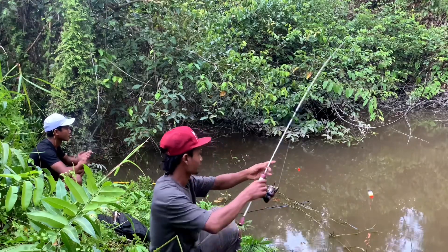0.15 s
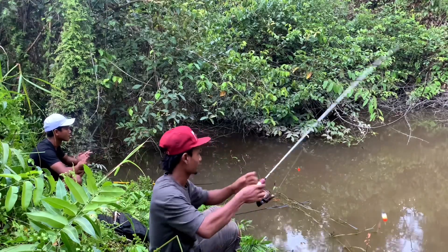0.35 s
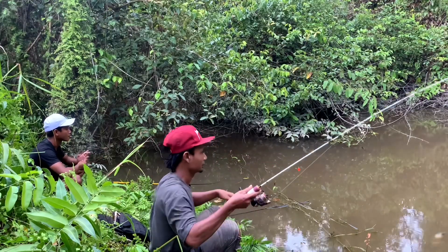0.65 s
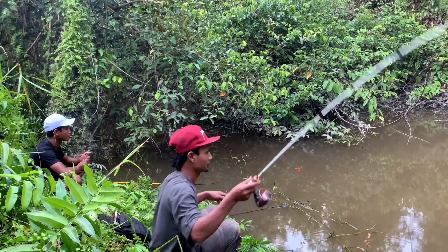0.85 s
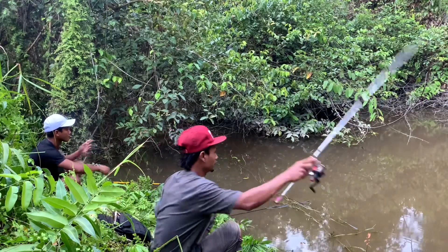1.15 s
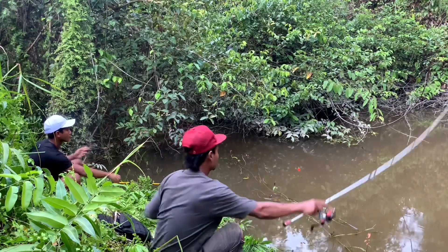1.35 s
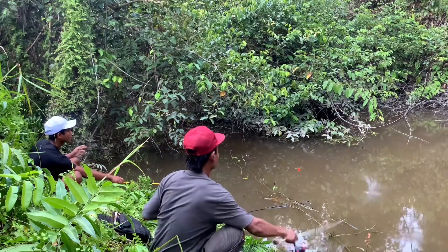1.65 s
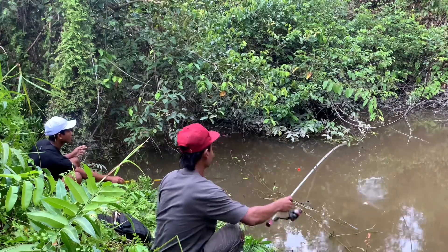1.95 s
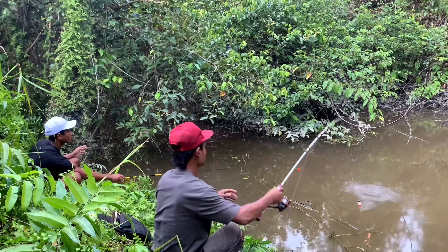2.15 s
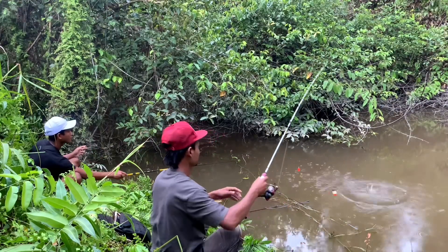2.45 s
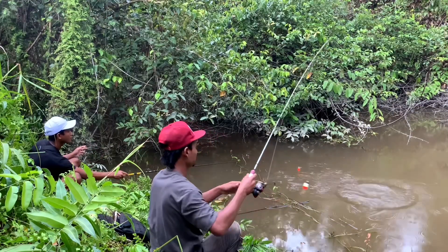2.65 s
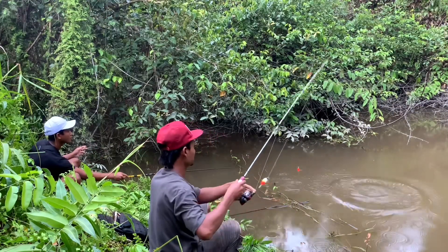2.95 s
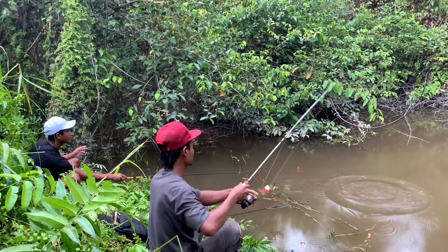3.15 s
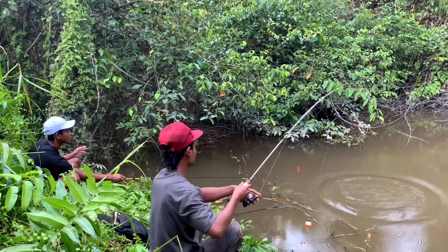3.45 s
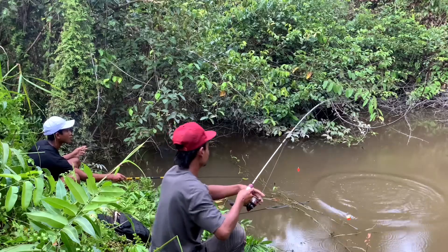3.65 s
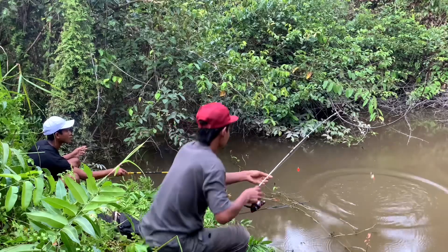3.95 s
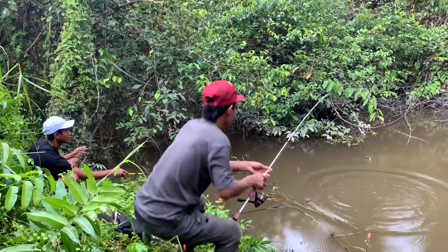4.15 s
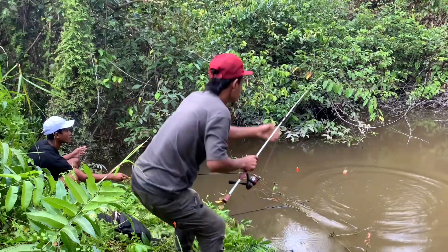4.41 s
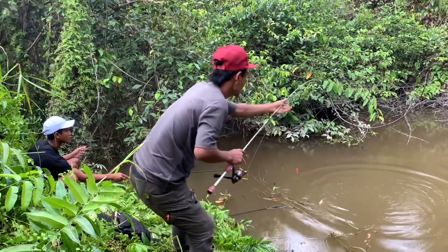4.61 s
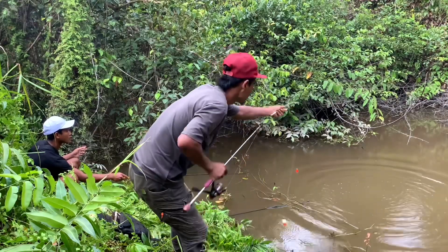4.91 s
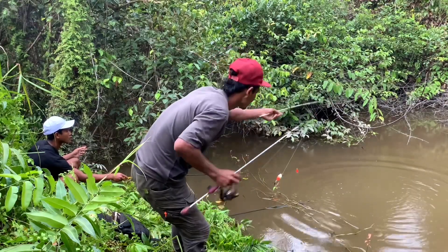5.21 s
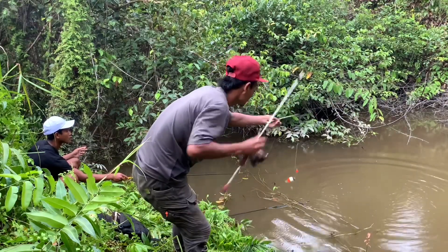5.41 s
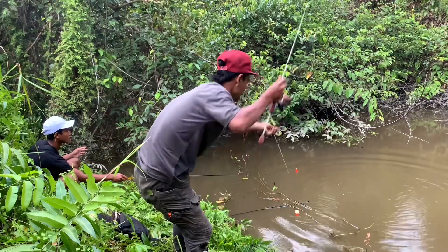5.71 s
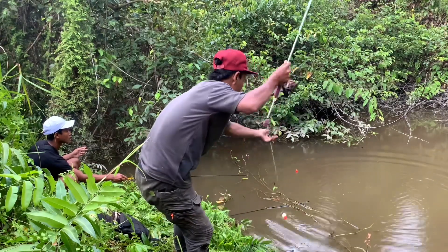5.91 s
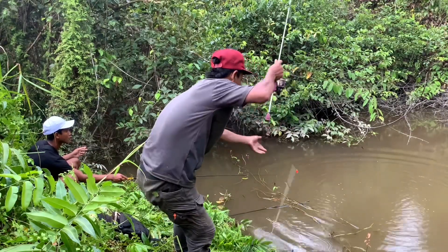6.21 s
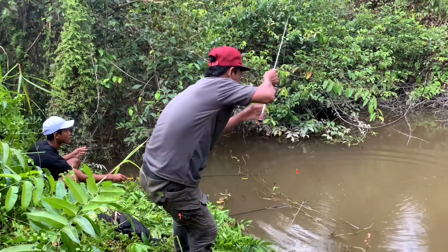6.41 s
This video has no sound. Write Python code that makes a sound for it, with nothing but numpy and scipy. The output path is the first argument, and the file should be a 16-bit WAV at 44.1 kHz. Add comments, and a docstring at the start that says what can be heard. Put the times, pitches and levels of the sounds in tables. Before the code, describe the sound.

High crickets trill in repeated bursts over a steady insect hiss, while frogs pip at several pitches along a forest river. Nearby, a fishing reel clicks and a cast hits the water with a sharp slap, followed by falling drops and bubbles. Plants rustle briefly, then line and cloth slide softly and the reel clicks again. The frogs grow gradually louder, echoing lightly off the trees.

```python
"""Crickets trill over a steady insect hiss while low and high frogs pip along a forest river bank.
Each stroke of a cricket's wings makes one tiny note; each frog call is a rising note that echoes off
the trees. Faint whistles drift in. An angler's reel clicks, plants rustle and the swung rod hums.
The cast slaps the water, drops fall back and bubbles of trapped air ring.
Later, line and sleeve slide over the rod and cloth brushes softly."""
import sys
import numpy as np
from scipy import signal
from scipy.fft import rfft, irfft, next_fast_len
from scipy.io import wavfile
from scipy.ndimage import uniform_filter1d

SR = 44100
rng = np.random.default_rng(int(sys.argv[2]) if len(sys.argv) > 2 else 0)


def wrap_up_sound(samples):
    """Save the sound to the file named by the first command line argument, as 16-bit audio."""
    columns = np.atleast_2d(samples).T
    # keep every value between -1 and 1, then stretch to whole-number steps
    tamed = np.clip(columns, -1, 1)
    steps = np.round(tamed * 32767).astype(np.int16)
    wavfile.write(sys.argv[1], SR, steps)


N = 289737
TIME = np.arange(N) / SR

def undb(db):
    """Turn decibels into a number to multiply a sound by."""
    return 10 ** (np.asarray(db) / 20)

def unit(x):
    """Scale a sound to an average strength (rms) of 1."""
    return x / np.sqrt(np.mean(x ** 2))

def colour(x, points):
    """Shape the lows and highs by (frequency [Hz], level [dB]) points; the result has strength 1."""
    hz, db = np.transpose(points)
    size = next_fast_len(N)
    freqs = np.maximum(np.fft.rfftfreq(size, 1 / SR), 1)
    gain = undb(np.interp(np.log(freqs), np.log(hz), db))
    return unit(irfft(rfft(x, size) * gain, size)[..., :N])

def walk(rate):
    """A random wander, mostly between -1 and 1, that turns `rate` times a second."""
    knots = rng.standard_normal(int(N / SR * rate) + 2)
    return np.interp(TIME * rate, np.arange(len(knots)), knots)

def pair(x, width):
    """Mix two unrelated signals into left and right; width 0 makes both ears alike."""
    return x[0] + width * x[1] * np.array([[1], [-1]])

def noise(points, width):
    """Steady stereo noise with the given tone colour."""
    return colour(pair(rng.standard_normal((2, N)), width), points)

def wavering_tone(hz, depth, rate):
    """A pure tone whose pitch wanders at random."""
    return np.sin(2 * np.pi * np.cumsum(hz * (1 + depth * walk(rate))) / SR)

def add(out, s, x):
    """Mix a short sound in at s seconds."""
    i = int(s * SR)
    a, b = max(i, 0), min(i + x.shape[-1], N)
    if b > a:
        out[..., a:b] += x[..., a - i:b - i]

def forest(x, t60, early_db, early_s=0.025):
    """Echoes only: a few from near trunks, and a smooth forest tail that falls 60 dB in t60 seconds."""
    t = np.arange(SR // 2) / SR
    shape = (2, len(t))
    trunks = (rng.random(shape) < 900 / SR) * rng.choice([-1, 1], shape) * np.sqrt(SR / 900)
    tail = rng.standard_normal(shape) * undb(-60 * t / t60)
    echoes = tail + trunks * undb(early_db) * np.exp(-t / early_s)
    echoes *= 1 - np.exp(-(t / 0.0088) ** 2)  # echoes take a moment to arrive
    echoes /= np.sqrt(np.sum(echoes ** 2, axis=1, keepdims=True))
    return signal.fftconvolve(np.atleast_2d(x), echoes, axes=1)[:, :N]

def bounce(x, late_ms, db):
    """Add one near echo, always equally late as the caller sits still; it makes gliding notes pulse."""
    lag = round(late_ms * SR / 1000)
    echo = undb(db) * np.pad(x, ((0, 0), (lag, 0)))[:, :N]
    return (x + echo) / np.sqrt(1 + undb(db) ** 2)

def pip(hz, half_s, sweep, lead_ms=0, sag=0, attack=1, scoop=0):
    """One gliding note that swells as it passes the pitch at which the caller's body rings best."""
    u = np.linspace(-1, 1, 2 * int(half_s * SR))  # -1 at the start, 1 at the end
    # in octaves: sweep tilts the pitch, sag lowers its end, scoop lowers its start
    pitch = hz * 2 ** (sweep * u - sag * np.maximum(u, 0) ** 2 - scoop * np.minimum(u, 0) ** 2)
    left_lead = np.pi * hz * lead_ms / 1000 * np.array([[1], [-1]])
    phase = 2 * np.pi * np.cumsum(pitch) / SR + left_lead
    foot = np.where(u < 0, .2 * min(attack, 1), .2)
    off_peak = np.where(u < 0, u / attack, u) / .36
    swell = np.cos(np.pi * u / 2) * (foot + (1 - foot) / (1 + off_peak ** 6))
    return np.sqrt(2) * swell * np.sin(phase)

# When the nearest cricket starts each trill: (time [s])
TRILL_TIMES = [-.27, .5, 1.26, 2.09, 3.23, 3.99, 4.775, 5.49, 6.235]
def cricket(after_s, length_s, hz, sag, db, echo_db, lead_ms, strokes_per_s=44.5):
    """Each wing stroke makes a note that sags as the wing slows; a trill starts soft and a bit low."""
    out = np.zeros((2, N))
    for start in np.array(TRILL_TIMES) + after_s:
        for s in np.arange(start, start + length_s, 1 / strokes_per_s):
            slack = np.exp(-(s - start) / 0.042)
            size, detune, late = rng.standard_normal(3)
            note = pip(hz * (1 - 0.021 * slack + .002 * detune), 0.0144, -0.018, lead_ms, sag)
            add(out, s - .014 + .0004 * late, undb(db - 4.7 * slack + size) * note)
    return out + undb(echo_db) * forest(out, t60=0.45, early_db=5, early_s=0.014)

# Crickets far away: (pitch [Hz], level [dB])
FAR_CRICKET_TONES = [(7522, -50.5), (7613, -53.5), (8068, -49.5), (8312, -57)]
def far_crickets():
    """Single far crickets stand out of the hiss as thin wavering tones."""
    out = np.zeros((2, N))
    for hz, db in FAR_CRICKET_TONES:
        out += wavering_tone(hz, depth=.006, rate=300) * undb(db + 2 * walk(3.7))
    return forest(out, t60=0.2, early_db=6)

# Tone colour of countless insects: (frequency [Hz], level [dB])
INSECT_COLOUR = [(5900, -29), (6300, -15), (6650, -2), (6950, 6.5), (7250, 2), (7550, 2.5), (7850, 2),
                 (8100, -5.5), (8450, -12.5), (8900, -25), (9400, -105)]
def insect_hiss():
    """Distant insects merge into a shimmering hiss; the highest of them sit to the right."""
    hiss = noise(INSECT_COLOUR, width=1) * undb(-35 + .5 * walk(2.7) + 1.04 * walk(60))
    buzz_colour = [(7500, -55.5), (7850, -13), (8070, 7.5), (8400, -1.5), (8900, -29.5), (9400, -78.5)]
    buzz = colour(rng.standard_normal(N), buzz_colour)
    return hiss + buzz * undb(np.array([[-52], [-43]]) + walk(40))

# Tone colour of the river and forest air: (frequency [Hz], level [dB])
AIR_COLOUR = [(20, -17), (45, 6), (80, 6), (150, 1.5), (300, -3.5), (900, -13), (3000, -69), (5700, -12),
              (9000, -67.5), (11000, -58), (13500, -8.5), (15800, -39)]
def air():
    """River and leaves rumble and hiss softly, nearly alike in both ears."""
    return noise(AIR_COLOUR, width=.36) * undb(-57 + 0.53 * walk(1.84))

# How loud the far frogs are as time passes: (time [s], level [dB])
FAR_FROG_LEVELS = [(0, -44.5), (1.8, -50), (3.3, -44), (6.57, -39)]
def far_frogs(count=100):
    """A crowd of frogs pips around four pitches, deep in the trees."""
    out = np.zeros((2, N))
    for hz, db in ((1860, -3), (2150, -12), (2500, -5.5), (2730, 0)):
        times = (np.arange(count) + rng.random(count)) / count * N / SR
        for s, (size, detune, side) in zip(times, rng.standard_normal((count, 3))):
            note = pip(hz * (1 + .03 * detune), half_s=0.01607, sweep=0.1474, lead_ms=0.099 * side)
            add(out, s, undb(db + 3.1 * size) * note)
    crowd = unit(undb(-4) * out + forest(out, t60=0.22, early_db=-0.5))
    return crowd * undb(np.interp(TIME, *np.transpose(FAR_FROG_LEVELS)))

def flutter(shape, fastest_hz=260):
    """The quick random wobble of a rough voice."""
    smoothing = signal.butter(4, fastest_hz, fs=SR, output="sos")
    return unit(signal.sosfilt(smoothing, rng.standard_normal(shape)))

NEAR_CALL_DB = -27  # a call from close by
def frog_voice(calls, sweep, sag, attack, scoop, grit_db, rasp_db, direct_db, echo_db, t60):
    """Rising pips, no two quite alike; grit roughens the note itself and rasp roughens its echoes."""
    direct, echoes = np.zeros((2, 2, N))
    for s, db, hz, half_s, lead_ms in calls:
        bend, snap = np.exp(.3 * rng.standard_normal(2))
        note = undb(db) * pip(hz, half_s, sweep * bend, lead_ms, sag, attack * snap, scoop)
        wobble = flutter(note.shape)
        echo_share = undb(.42 * (NEAR_CALL_DB - db))  # weak calls come from further off and echo more
        raspy = echo_share * note * (1 + undb(rasp_db) * wobble)
        add(direct, s - half_s, note * (1 + undb(grit_db) * wobble[0]))
        add(echoes, s - half_s, forest(raspy, t60, early_db=5, early_s=0.021))
    return undb(direct_db) * direct + undb(echo_db) * echoes

# Calls of the low frogs: (time [s], level [dB], pitch [Hz], level of the upper tone [dB])
LOW_CALLS = [(0.01, -36, 1677, -39), (0.162, -37, 1690, -49), (0.201, -41, 1633, -55),
             (0.396, -38, 1700, -37.5), (0.525, -36, 1640, -39), (0.79, -34, 1696, -44),
             (0.819, -43, 1743, -39.5), (0.961, -37.5, 1712, -36.5), (1.098, -34.5, 1710, -33),
             (1.214, -36.5, 1737, -38.5), (1.355, -31.5, 1687, -33.5), (1.588, -33.5, 1689, -42),
             (1.627, -36, 1751, -38), (1.953, -32.5, 1722, -41), (2.018, -38.5, 1876, -60),
             (2.116, -37.5, 1743, -37.5), (2.289, -33, 1672, -41), (2.348, -37, 1764, -32.5),
             (2.475, -36.5, 1764, -44), (2.496, -32.5, 1733, -50), (2.733, -32, 1742, -40),
             (2.88, -37, 1743, -32.5), (3.041, -30.5, 1729, -34.5), (3.24, -32.5, 1727, -44),
             (3.289, -35, 1760, -30.5), (3.426, -32, 1737, -38), (3.6, -30.5, 1732, -34),
             (3.825, -33, 1739, -35), (3.946, -35.5, 1850, -49), (4.011, -31.5, 1720, -62),
             (4.157, -31.0, 1773, -34.5), (4.364, -32, 1733, -36), (4.479, -38, 1876, -53),
             (4.544, -32.5, 1764, -35), (4.598, -35, 1816, -29.5), (4.735, -32, 1732, -64),
             (4.829, -39.5, 1857, -56), (4.883, -33.5, 1818, -35), (5.066, -30.5, 1784, -35),
             (5.245, -34, 1774, -31), (5.437, -32, 1743, -42), (5.584, -31.5, 1838, -31.5),
             (5.755, -30, 1721, -59), (5.895, -31.5, 1822, -34), (5.944, -38, 1880, -44),
             (6.058, -32, 1718, -39), (6.076, -33, 1845, -31), (6.203, -32.5, 1827, -30),
             (6.394, -31.5, 1755, -55), (6.465, -35, 1840, -32), (6.537, -32, 1844, -29.5)]
def low_frogs(half_s=0.02):
    """Each call opens with a short rasp, then sounds a main tone, an upper tone and a rough ring."""
    main_rows = [(s, db, hz, half_s, -0.042) for s, db, hz, _ in LOW_CALLS]
    upper_rows = [(s, db, hz * 1.47, .015, -0.11) for s, _, hz, db in LOW_CALLS]
    rasp_rows = [(s - .011, db - 12, hz * 1.38, 0.011, -0.11) for s, db, hz, _ in LOW_CALLS]
    main = frog_voice(main_rows, sweep=0.24, sag=.08, attack=0.58, scoop=.24,
                      grit_db=-12, rasp_db=-9, direct_db=1.6, echo_db=-3.3, t60=.3)
    upper = frog_voice(upper_rows, sweep=0.1558, sag=0.042, attack=0.95, scoop=0.1,
                       grit_db=-6, rasp_db=-5.5, direct_db=1, echo_db=-3, t60=0.32)
    rasp = frog_voice(rasp_rows, sweep=0.2, sag=0.03, attack=1, scoop=0.1,
                      grit_db=-3.5, rasp_db=-8, direct_db=0, echo_db=-10.5, t60=0.35)
    tones = bounce(main, late_ms=7.12, db=-7) + bounce(upper, late_ms=12.09, db=-10.5)
    return rasp + tones + octave_ring(LOW_CALLS, half_s)

def octave_ring(calls, half_s):
    """A low call also rings roughly at about twice its pitch, heard by way of the trees."""
    out = np.zeros((2, N))
    for s, db, hz, _ in calls:
        size, detune = rng.standard_normal(2)
        ring_hz = (3643 + 0.9 * (hz - 1782)) * (1 + .018 * detune)
        ring_db = db - 11.5 + .6 * (db - NEAR_CALL_DB) + 2 * size  # weaker calls ring less
        note = undb(ring_db) * pip(ring_hz, half_s, sweep=0.1)
        rough = note * (1 + undb(-2) * flutter(note.shape))
        add(out, s - half_s, forest(rough, t60=0.31, early_db=6, early_s=0.021))
    return out

# Calls of the high frogs: (time [s], level [dB], pitch [Hz], half length [s], left ear's lead [ms])
HIGH_CALLS = [(0.064, -45, 2980, 0.029, -0.028), (0.289, -36.5, 2896, 0.025, -0.19),
              (0.36, -38.5, 2940, 0.018, -0.1), (0.647, -47.5, 2935, 0.031, 0.038),
              (0.71, -36, 2620, 0.013, -0.059), (0.844, -44.5, 2830, 0.026, -0.11),
              (1.518, -35, 2613, 0.012, -0.058), (1.905, -38, 2593, 0.013, 0.059),
              (1.995, -33, 2680, 0.01, 0.034), (2.251, -35.5, 2626, 0.012, -0.09),
              (2.468, -32.5, 2687, 0.0093, -0.018), (2.617, -36.5, 2520, 0.012, -0.085),
              (2.702, -32, 2687, 0.019, -0.043), (2.951, -40.5, 2640, 0.012, -0.044),
              (3.056, -28.5, 2816, 0.021, 0.021), (3.206, -39.5, 2535, 0.011, -0.012),
              (3.402, -30, 2815, 0.015, 0.048), (3.487, -36, 2620, 0.012, -0.037),
              (3.712, -28, 2836, 0.023, -0.024), (3.932, -33.5, 2620, 0.012, -0.029),
              (4.067, -36.5, 2596, 0.011, -0.0091), (4.18, -27, 2813, 0.019, 0.11),
              (4.463, -29, 2706, 0.013, 0.046), (4.874, -27.5, 2812, 0.022, 0.043),
              (5.222, -40.5, 2574, 0.027, 0.061), (5.315, -24.5, 2842, 0.021, -0.11),
              (5.468, -31, 2642, 0.013, 0.049), (5.645, -27, 2870, 0.027, -0.049),
              (5.815, -35, 2580, 0.016, -0.16), (5.881, -39, 2605, 0.018, 0),
              (5.931, -29.5, 2772, 0.014, 0.021), (6.134, -37.5, 2593, 0.014, -0.056),
              (6.252, -29, 2860, 0.032, -0.0012)]
def high_frogs():
    """Each call is a clear high pip with a weak lower tone just behind it."""
    under_rows = [(s + 0.01, db - 10, hz * .67, half_s, lead) for s, db, hz, half_s, lead in HIGH_CALLS]
    main = frog_voice(HIGH_CALLS, sweep=0.16, sag=.03, attack=1, scoop=.08,
                      grit_db=-17, rasp_db=-21, direct_db=2.3, echo_db=-5, t60=.4)
    under = frog_voice(under_rows, sweep=0.2194, sag=0.041, attack=0.8, scoop=0.1,
                       grit_db=-7, rasp_db=-5.5, direct_db=-2, echo_db=-5, t60=0.25)
    return bounce(main, late_ms=12.09, db=-10.5) + bounce(under, late_ms=7.12, db=-7)

# Faint, thin whistles from far off: (middle time [s], level [dB], pitch [Hz], half length [s])
WHISTLE_NOTES = [(.88, -54.5, 5740, .45), (1.75, -56, 5460, .42), (2.42, -56, 5760, .33),
                 (5.88, -54.5, 5740, .45)]
def whistles():
    """Long wavering notes are blurred by the trees."""
    out = np.zeros((2, N))
    for s, db, hz, half_s in WHISTLE_NOTES:
        swell = undb(db) * np.exp(-(1.5 * (TIME - s) / half_s) ** 4)
        out += swell * wavering_tone(hz, depth=.024, rate=400)
    return forest(out, t60=0.22, early_db=25)

# Tone colour of the reel's rattle: (frequency [Hz], level [dB])
RATTLE_COLOUR = [(1000, -20), (5000, -15), (8000, -8), (10300, 5), (12000, -3), (13300, -1), (14500, -14),
                 (16000, -27)]
# Clicks of the reel: (time [s], level [dB], knock against that level [dB], rattle against it [dB])
REEL_CLICKS = [(1.1442, -58, -12, -9), (1.284, -42, 6.5, -14), (1.448, -42, 3.5, -10),
               (1.5119, -32, -20, -13), (1.969, -39.5, -28, -6), (2.1874, -36, -21, -8),
               (2.535, -35, -10, -8.5), (3.727, -55.5, 24, -16), (4.615, -45, -20, -22),
               (6.151, -58, 14, -17), (6.201, -29.5, -32, -8.5), (6.347, -32, -19, -20),
               (6.363, -27.5, -22, -24)]
def reel():
    """The reel's wire arm snaps: a bright dry tick, a brief rattle and a dull knock of the body."""
    snaps, knocks = np.zeros((2, N))
    t = np.arange(SR // 4) / SR
    for s, db, knock_db, rattle_db in REEL_CLICKS:
        add(snaps, s, undb(db) * (np.exp(-t / 0.0021) + undb(rattle_db) * np.exp(-t / 0.027)))
        add(knocks, s, undb(db + knock_db) * np.exp(-t / .003))
    rattle = noise(RATTLE_COLOUR, width=0.8) * undb(-1.5 + 3.5 * walk(300))
    body_colour = [(150, -15), (600, -7), (2300, 2), (4200, 4), (6000, -6), (9000, -33), (15000, -44)]
    body = noise(body_colour, width=0.37)
    return rattle * uniform_filter1d(snaps, size=70) + body * uniform_filter1d(knocks, size=70)

def patter(points, per_s, spread_db, width):
    """A dense patter of tiny hits of very unequal size."""
    ticks = (rng.random((2, N)) < per_s / SR) * rng.choice([-1, 1], (2, N))
    sizes = undb(spread_db * np.minimum(rng.exponential(size=(2, N)), 3.5))
    return colour(pair(ticks * sizes, width), points)

def swells(rows):
    """Loudness of movements that grow and fade: (middle time [s], level [dB], half length [s])."""
    return sum(undb(db) * np.exp(-((TIME - s) / half_s) ** 2) for s, db, half_s in rows)

# Tone colour of the rustling: (frequency [Hz], level [dB])
PLANT_COLOUR = [(80, 1), (300, 3), (1100, 6), (3000, 9), (6000, 3), (10500, 3), (13700, -4), (16000, -46)]
# Rustles of plants and clothes: (middle time [s], level [dB], half length [s])
PLANT_RUSTLES = [(1.18, -51.5, 0.05), (1.46, -50.5, 0.077), (3.785, -44, 0.031), (3.857, -38, 0.053),
                 (3.945, -41.5, 0.05), (4.02, -44, 0.046), (4.125, -48.5, 0.028)]
def plants():
    """The angler brushes plants and clothes, setting off many tiny ticks."""
    return patter(PLANT_COLOUR, per_s=5000, spread_db=2.5, width=0.8) * swells(PLANT_RUSTLES)

def rod():
    """The swung rod leaves little whirls in the air and hums faintly and fitfully."""
    hum = wavering_tone(hz=585, depth=.1, rate=160) * undb(4 * walk(35))
    return hum * swells([(1.34, -61, 0.23)])

SLAP_S = 1.7262  # when the cast hits the water
def slap():
    """The cast hits the water with a very short, bright crack."""
    hit = np.zeros(N)
    t = np.arange(SR // 50) / SR
    add(hit, SLAP_S, undb(-2) * np.exp(-t / 0.0011))
    crack_colour = [(300, -23), (3000, -7), (7000, -6), (10500, 13), (14000, 7.5), (15800, -30)]
    return hit * colour(rng.standard_normal(N), crack_colour)

def burst(s, db, decay_s, rise_s=0.0076):
    """Loudness of one splash: a quick rise, then a smooth fall."""
    age = np.maximum(TIME - s, 0)
    return undb(db) * np.minimum(age / rise_s, 1) * np.exp(-age / decay_s)

def from_right(x, late_ms):
    """A sound on the right reaches the left ear a little later."""
    size = next_fast_len(N)
    delay = np.exp(-2j * np.pi * np.fft.rfftfreq(size, 1 / SR) * late_ms / 1000)
    return np.array([irfft(rfft(x[0], size) * delay, size)[:N], x[1]])

# Tone colour of the spray: (frequency [Hz], level [dB])
SPATTER_COLOUR = [(100, -17), (300, -22), (900, -12), (2500, -1), (3800, -4), (5600, -1), (7500, -1.5),
                  (10500, -5.5), (13700, -10), (15500, -46)]
# The cast and the water falling back: (time [s], spray level [dB], gurgle level [dB], fade time [s])
SPLASH_BURSTS = [(1.72, -21, -41, 0.029), (1.79, -37, -70, 0.021), (1.975, -41, -58, 0.073),
                 (2.045, -44, -41.5, 0.044), (2.085, -48, -42, 0.018), (2.15, -49, -47, 0.05),
                 (2.215, -40, -56, 0.028), (2.282, -33.5, -68, 0.021), (2.335, -49, -66, 0.046)]
def splash():
    """The slap throws up spray and drops and stirs up bubbles, a little to the right."""
    fizz = gurgle() * sum(burst(s, db, fade) for s, _, db, fade in SPLASH_BURSTS)
    crack = slap()
    spray = patter(SPATTER_COLOUR, per_s=1500, spread_db=3.2, width=0.29)
    spray *= sum(burst(s, db, fade) for s, db, _, fade in SPLASH_BURSTS)
    spray *= undb(3.5 * walk(170))  # droplets come down in clumps
    water = (bubbles() + fizz) * undb([[-1.8], [1.8]]) + spray + drops()
    softened = undb(-6) * crack  # only part of the crack echoes back from the trees
    echoes = forest(water + softened, t60=0.28, early_db=4, early_s=0.03)
    return from_right(water + crack, late_ms=0.1245) + undb(-9.5) * echoes

def bubble(hz, ring_s, glide):
    """Trapped air rings, slides in pitch and dies away."""
    t = np.arange(int(ring_s * SR)) / SR
    phase = 2 * np.pi * np.cumsum(hz * 2 ** (2 * glide * t / ring_s)) / SR
    return undb(-60 * t / ring_s) * (1 - np.exp(-t / 0.0017)) * np.sin(phase)

def gurgle(count=900):
    """Many small bubbles ring in the second after the slap."""
    out = np.zeros(N)
    for s, size, pitch in rng.random((count, 3)):
        hz = 520 * 3.4 ** pitch
        add(out, SLAP_S + s, undb(20 * size) * bubble(hz, ring_s=26 / hz, glide=0.37))
    return out / np.sqrt(np.sum(out ** 2) / SR)

# Single bubbles: (time [s], level [dB], starting pitch [Hz], slide halfway through the ring [octaves])
RIVER_BUBBLES = [(1.739, -18.5, 819, -0.31), (1.759, -28, 1350, -0.02), (1.793, -34, 537, -0.74),
                 (1.987, -23, 1374, 0.12), (2.003, -40, 640, -0.4), (2.036, -36.5, 800, -0.37),
                 (2.048, -26.5, 592, .03), (2.088, -35, 528, 0.21), (2.096, -32, 810, 0.87),
                 (2.108, -36, 696, 0.36), (2.127, -32, 1250, -0.017), (2.138, -35, 1040, .1),
                 (2.174, -29.5, 1136, 0.3), (2.177, -37.5, 690, -.2), (2.194, -31, 1460, 0.00007),
                 (2.205, -37, 1080, 0.17), (2.284, -21, 1136, 0.76), (2.362, -39.5, 706, 2.1),
                 (2.613, -32, 1033, -0.23), (2.633, -30, 727, -0.38)]
def bubbles(ring_cycles=40.4):
    """The hollow left by the slap thumps, then single bubbles ring."""
    out = np.zeros(N)
    add(out, SLAP_S, undb(-30) * bubble(hz=177, ring_s=0.052, glide=-0.61))
    add(out, SLAP_S, undb(-24.5) * bubble(hz=414, ring_s=0.03, glide=-1.43))
    for s, db, hz, glide in RIVER_BUBBLES:
        add(out, s, undb(db) * bubble(hz, ring_cycles / hz, glide))
    return out

# Calls of the middle frog: (time [s], level [dB], pitch [Hz], half length [s], left ear's lead [ms])
MIDDLE_CALLS = [(1.775, -39.5, 2080, 0.011, 0), (2.135, -40.5, 2055, 0.016, 0.012),
                (2.56, -44, 2140, 0.022, 0.0058), (2.85, -41, 2090, 0.022, 0.00091),
                (3.355, -41, 2160, 0.018, 0), (3.665, -39, 2100, 0.016, 0.0044)]
def middle_frog():
    """A quieter frog pips at a pitch between the low and high ones."""
    return frog_voice(MIDDLE_CALLS, sweep=0.15, sag=0.031, attack=1, scoop=0.052,
                      grit_db=-11, rasp_db=-10.5, direct_db=-4, echo_db=-6.5, t60=0.74)

# Tone colour of a drop landing: (frequency [Hz], level [dB])
SMACK_COLOUR = [(600, -18), (2000, -5), (4400, 7), (7000, -6), (11000, -12), (15000, -27)]
# Larger drops landing: (time [s], level [dB])
FALLING_DROPS = [(1.799, -35), (1.848, -40), (2.047, -36), (2.086, -39), (2.227, -36), (2.295, -28)]
def drops(decay_s=0.0037):
    """Single larger drops smack back on the water."""
    t = np.arange(SR // 20) / SR
    hits = np.zeros(N)
    for s, db in FALLING_DROPS:
        add(hits, s, undb(db) * np.exp(-t / decay_s))
    return hits * noise(SMACK_COLOUR, width=0.28)

# Tone colour of the sliding: (frequency [Hz], level [dB])
LINE_COLOUR = [(300, -53), (1500, 12.5), (4500, 12.5), (9000, 0), (11000, 2), (13200, 6), (15500, -38)]
# Slides along the rod: (middle time [s], level [dB], half length [s])
LINE_SLIDES = [(4.81, -51, 0.033), (4.89, -45, 0.051), (6.265, -50.5, 0.044)]
def line_slide():
    """Line and sleeve rub over the rod with a fine scratch."""
    return patter(LINE_COLOUR, per_s=4000, spread_db=2.3, width=0.78) * swells(LINE_SLIDES)

# Tone colour of the cloth: (frequency [Hz], level [dB])
CLOTH_COLOUR = [(500, -24), (2000, 0), (4700, -2), (7000, -10), (10000, -45)]
# A brush of cloth: (middle time [s], level [dB], half length [s])
CLOTH_BRUSHES = [(5.305, -50.5, 0.042)]
def cloth():
    """Cloth rubs with a duller rustle."""
    return patter(CLOTH_COLOUR, per_s=5000, spread_db=1.5, width=0.66) * swells(CLOTH_BRUSHES)

def scene():
    """Insects all round, frogs along the water, the angler in front."""
    near = cricket(after_s=0, length_s=.34, hz=6850, sag=0.15, db=-32.1, echo_db=-8, lead_ms=0.005)
    # a second cricket fills the pauses
    answer = cricket(after_s=.37, length_s=0.46, hz=6990, sag=0.16, db=-44.5, echo_db=6, lead_ms=.01)
    insects = bounce(near, late_ms=6.122, db=-13) + answer + far_crickets() + insect_hiss()
    frogs = (far_frogs() + low_frogs() + high_frogs() + middle_frog()) * undb([[-.3], [.3]])
    rustle = (plants() + line_slide() + cloth()) * undb(1.8 * walk(110))  # rubbing catches unevenly
    return insects + air() + frogs + whistles() + reel() + rustle + rod() + splash()

def record(dry):
    """Round off the loudest peak and cut the very highest treble."""
    treble_cut = signal.ellip(10, .2, 80, 15900, fs=SR, output="sos")
    return signal.sosfilt(treble_cut, np.tanh(dry))

dry = scene()
out = record(dry)
wrap_up_sound(out)
```